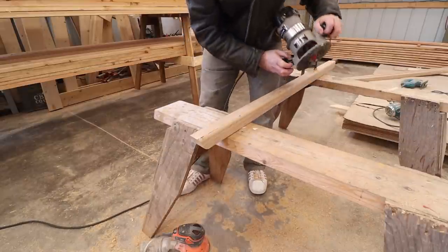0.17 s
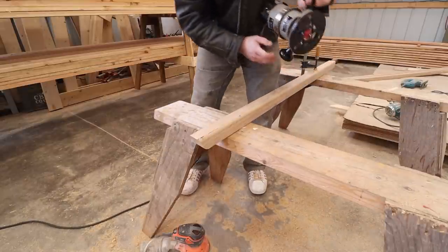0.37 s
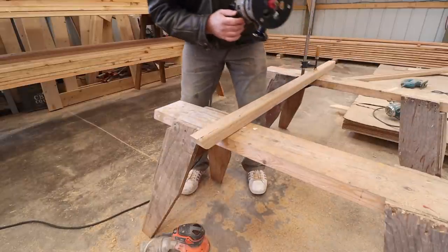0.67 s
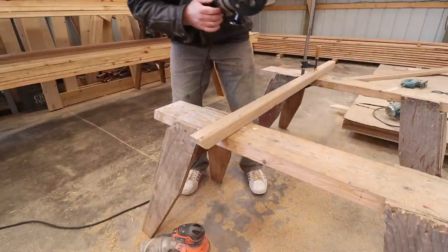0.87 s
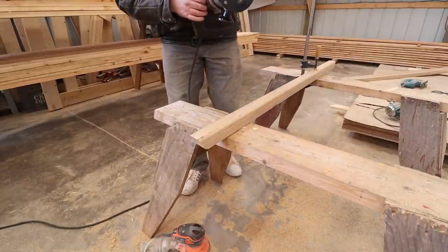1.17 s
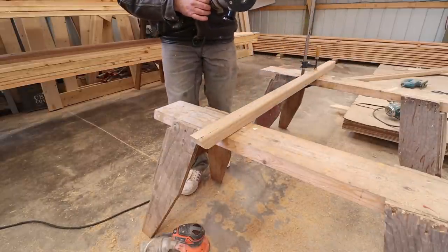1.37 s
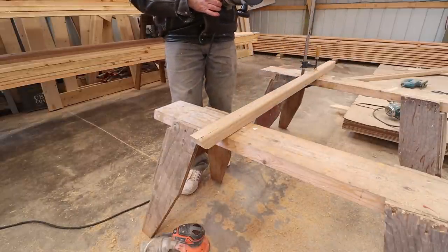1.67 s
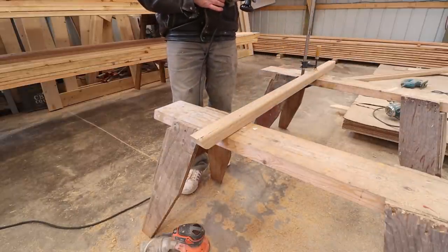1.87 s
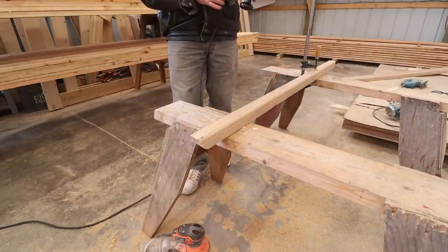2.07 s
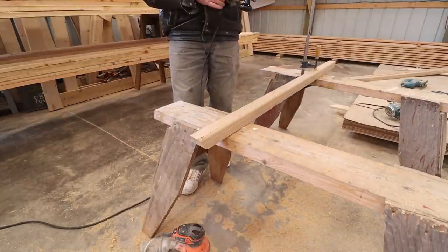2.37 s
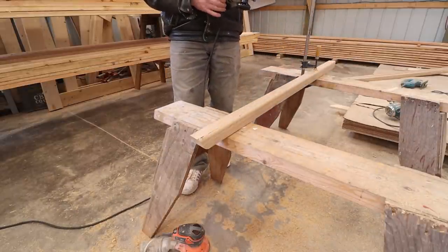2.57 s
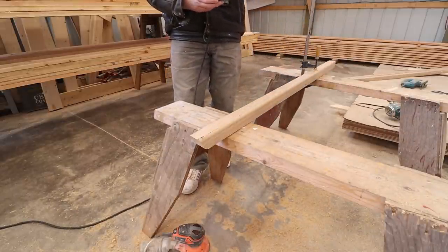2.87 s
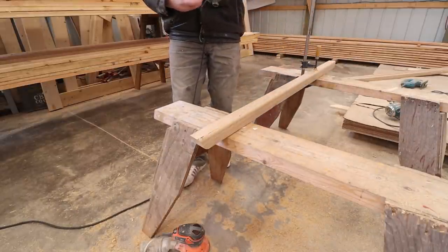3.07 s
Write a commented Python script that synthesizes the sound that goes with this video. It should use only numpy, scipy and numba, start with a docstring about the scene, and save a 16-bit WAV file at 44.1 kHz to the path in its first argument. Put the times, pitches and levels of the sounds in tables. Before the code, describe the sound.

A handheld router runs unloaded, with a broad airy roar and piercing whine that swing in tone as it is lifted and turned, then switched off and starting to slow, in a reverberant workshop, miked nearby.

```python
"""A broad airy rush with shifting hollow rings and a swinging whine: a handheld router runs free in a timber
workshop, lifted off the work, turned in the hands and switched off. The cooling fan's rush through the housing
vents is filtered noise; blades, cutter and commutator sing as sines on multiples of the shaft speed.
The concrete floor mirrors the rush a few milliseconds late, and the shop reverberates rush and tones."""
import sys
import numpy as np
from scipy import signal
from scipy.fft import rfft, irfft
from scipy.io import wavfile
from scipy.ndimage import uniform_filter1d, map_coordinates
from numba import njit

SR = 44100
rng = np.random.default_rng(int(sys.argv[2]) if len(sys.argv) > 2 else 0)


def wav_out(sig):
    """Save sig, one row per channel (or a flat mono array), as 16-bit PCM at SR to the path in sys.argv[1]."""
    wavfile.write(sys.argv[1], SR, np.round(np.clip(np.atleast_2d(sig).T, -1, 1) * 32767).astype(np.int16))


N = 141120

FLICKER_HZ = 7  # pace of the flicker in the noise slices and the resonances


def undb(db):
    """Turn dB into gain."""
    return 10 ** (np.asarray(db) / 20)


def curve(table, column):
    """Draw one column of a table as straight lines over time, sample by sample."""
    rows = np.array(table, float)
    return np.interp(np.arange(N) / SR, rows[:, 0], rows[:, column])


def unit(x):
    """Scale to rms 1."""
    return x / np.sqrt(np.mean(x ** 2))


def walk(rate_hz):
    """Wander smoothly at random: levels held for 1 / rate seconds, slewed twice, spread near 1."""
    hold = int(SR / rate_hz)
    steps = np.repeat(rng.standard_normal(400), hold)[:N + hold]
    slewed = uniform_filter1d(uniform_filter1d(steps, hold), hold)
    return 1.3 * slewed[:N]


def fan():
    """Cooling air: broad rush and treble hiss of turbulence, two hollow bands and five narrower rings."""
    # Loudness of the rush: (time [s], broad rush [dB], treble [dB], top octave [dB])
    rush_levels = [(0, -31.5, -42.5, -46), (.35, -31, -40.5, -42), (.55, -30, -42.5, -44.5),
                   (.9, -31, -42.5, -46), (1.4, -30.5, -43.5, -46), (2.0, -31.5, -44.5, -47),
                   (2.43, -33, -43.5, -47), (2.8, -32.5, -46, -50.5), (3.2, -32.5, -48.5, -50.5)]
    # Spectrum of the broad rush: (frequency [Hz], relative density [dB per Hz])
    rush_colour = [(25, -46), (161, -29), (252, -14.5), (342, -12), (423, -13), (488, -9.5), (1440, -4),
                   (1740, -7), (3700, -9), (4690, -8.5), (5400, -8.5), (7000, -17), (9100, -38)]
    # Spectrum of the treble hiss: (frequency [Hz], relative density [dB per Hz])
    treble_colour = [(5000, -33), (6500, -40), (7300, 1), (8600, 2.5), (9700, 1), (10500, -5.5),
                     (11500, -15)]
    # Spectrum of the top octave: (frequency [Hz], relative density [dB per Hz])
    top_colour = [(9000, -39), (10300, -1.5), (11000, 1.5), (12600, 1.5), (14500, -4.5), (15500, -5.5),
                  (17000, -8)]
    # Wide hollow of the housing, shifting as the tool turns: (time [s], level [dB], centre [Hz])
    housing = [(0, -44, 1600), (.3, -36.5, 1880), (.8, -35, 1710), (1.5, -36, 1700), (2.3, -38.5, 1780),
               (2.9, -37.5, 1810), (3.2, -47, 1600)]
    # Wide, higher hollow of the vents, shifting likewise: (time [s], level [dB], centre [Hz])
    vent = [(0, -49, 5270), (.25, -43, 5600), (.5, -35, 5070), (.65, -33, 4500), (1.0, -38, 4860),
            (1.3, -39, 4800), (2.1, -35.5, 4900), (2.65, -39, 4840), (2.83, -38, 4970), (2.9, -60, 4960),
            (3.2, -47, 4860)]
    # Ring that slides down in pitch: (time [s], level [dB], centre [Hz])
    falling_ring = [(0, -42, 2140), (.22, -39.5, 2050), (.45, -33, 1605), (.75, -36, 1190),
                    (.88, -41.5, 1050), (1.3, -41, 1100), (1.9, -42.5, 1230), (2.55, -41.5, 1173),
                    (3.2, -45, 1020)]
    # Nasal ring in the middle: (time [s], level [dB], centre [Hz])
    nasal_ring = [(0, -36, 1560), (.3, -57, 1840), (.7, -33, 1880), (.88, -36.5, 1850), (1.02, -35, 1570),
                  (1.3, -32, 1680), (1.55, -34.5, 1740), (2.1, -37, 1854), (2.45, -40, 1790),
                  (2.9, -35, 1624), (3.2, -42.5, 1560)]
    # Low ring: (time [s], level [dB], centre [Hz])
    low_ring = [(0, -42.5, 830), (.35, -40.5, 693), (.6, -59, 646), (1.2, -47, 760), (2.3, -44.5, 716),
                (3.2, -52, 655)]
    # Bright ring: (time [s], level [dB], centre [Hz])
    bright_ring = [(0, -50, 2900), (.13, -37.5, 2950), (.35, -53, 2900), (1.9, -57, 2150), (2.3, -39, 2080),
                   (2.9, -51, 2120)]
    # Hissing ring: (time [s], level [dB], centre [Hz])
    hiss_ring = [(0, -42.5, 6350), (.35, -51, 6230), (.55, -34.5, 5900), (.75, -52, 5800), (1.4, -46, 5430),
                 (1.9, -36, 5600), (2.6, -36.5, 5640), (2.8, -41.5, 5330), (2.92, -46, 4640),
                 (3.1, -38, 4700), (3.2, -36, 4650)]
    ring_width_hz = 253
    swell_db, swell_hz = 0.4, 10  # the whole rush
    treble_swell_db, treble_swell_hz = 0.5, 8

    rush = coloured(rush_colour) * undb(curve(rush_levels, column=1))
    treble = coloured(treble_colour) * undb(curve(rush_levels, column=2))
    treble = treble + coloured(top_colour) * undb(curve(rush_levels, column=3))
    treble = treble * undb(treble_swell_db * walk(treble_swell_hz))
    hollows = resonance(housing, width_hz=960) + resonance(vent, width_hz=2100)
    rings = (resonance(falling_ring, ring_width_hz) + resonance(nasal_ring, ring_width_hz)
             + resonance(low_ring, width_hz=137) + resonance(bright_ring, ring_width_hz)
             + resonance(hiss_ring, width_hz=680))
    return (rush + treble + hollows + rings) * undb(swell_db * walk(swell_hz))


def coloured(table):
    """Turbulence noise of a given spectrum, in overlapping third-octave slices that each flicker alone."""
    flicker_db = 1.0
    rows = np.array(table, float)
    hz = np.arange(N // 2 + 1) * SR / N + 1  # 1 Hz up, so the logarithm exists at zero
    density_db = np.interp(np.log(hz), np.log(rows[:, 0]), rows[:, 1], left=-80, right=-80)
    spectrum = rfft(rng.standard_normal(N)) * undb(density_db)
    place = 3 * np.log2(hz)  # position in third-octaves
    noise = np.zeros(N)
    for centre in range(13, 44):  # about 20 Hz to 20 kHz
        triangle = np.clip(1 - abs(place - centre), 0, 1)
        noise += irfft(spectrum * triangle, N) * undb(flicker_db * walk(FLICKER_HZ))
    return unit(noise)


def resonance(table, width_hz):
    """Turbulent air ringing in a hollow of the housing: noise through two moving band-passes."""
    flicker_db = 0.6
    centre_hz = curve(table, column=2)
    air = rng.standard_normal(N)
    for _ in range(2):
        air = svf(air, centre_hz, float(width_hz))
    return unit(air) * undb(curve(table, column=1) + flicker_db * walk(FLICKER_HZ))


@njit
def svf(x, hz, width):
    """State-variable band-pass with a moving centre, unity gain at its peak."""
    y, band, low = np.empty(len(x)), 0., 0.
    for i in range(len(x)):
        g = np.tan(np.pi * hz[i] / SR)
        damping = width / hz[i]
        v = (band + g * (x[i] - low)) / (1 + g * (g + damping))
        band = 2 * v - band
        low = low + 2 * g * v
        y[i] = damping * v
    return y


def tones():
    """Blades, cutter and commutator pass a fixed number of times per turn, so they sing on shaft multiples."""
    # Fan-blade tone, swinging as the tool turns: (time [s], level [dB])
    blade_levels = [(0, -42), (.2, -39), (.24, -48), (.28, -35), (.34, -48), (.4, -38), (.48, -49),
                    (.54, -32.5), (.58, -39), (.62, -36.5), (.7, -41.5), (.87, -37), (.92, -56), (.99, -41),
                    (1.12, -52), (1.23, -38.5), (1.35, -58), (1.44, -46), (1.57, -41.5), (1.65, -41),
                    (1.7, -52), (1.77, -54), (1.82, -42.5), (1.9, -44), (1.97, -54), (2.03, -47.5),
                    (2.23, -46), (2.45, -48), (2.62, -51.5), (2.9, -43.5), (2.94, -56), (3.2, -52)]
    # Shaft-driven tones: (time [s], two-edged cutter [dB], commutator whine [dB])
    cutter_levels = [(0, -47, -57), (.45, -53, -58), (.6, -45, -54), (.85, -42.5, -55), (1.0, -42, -67),
                     (1.3, -41.5, -64), (1.68, -41.5, -57), (1.9, -47, -66), (2.15, -49.5, -70),
                     (2.45, -46.5, -70), (2.9, -46.5, -72), (3.04, -54, -55), (3.2, -56, -57)]
    blade_count, edge_count, bar_count = 17, 2, 22
    flutter_db, flutter_hz = 1.1, 35  # the blade tone flutters
    waver_db, waver_hz = 3, 12  # commutator whine and sidebands waver
    overtone_db, sideband_db, shaft_db = -26, -18, -14  # first two under the blades, last under the cutter
    turns = shaft()

    def line(count):
        """A sine of rms 1, count cycles per turn of the shaft."""
        return np.sqrt(2) * np.sin(2 * np.pi * (count * turns + rng.random()))

    def waver():
        """Slow random gain."""
        return undb(waver_db * walk(waver_hz))

    blades = line(blade_count) * undb(flutter_db * walk(flutter_hz))
    blades = blades + undb(overtone_db) * line(2 * blade_count)
    for side in (-1, 1):  # blades beating with the cutter
        blades = blades + undb(sideband_db) * line(blade_count + side * edge_count) * waver()
    cutter = line(edge_count) + undb(shaft_db) * line(count=1)
    commutator = line(bar_count) * waver()
    # the blade level glides in gain, the others in dB
    blade_gain = curve([(s, undb(db)) for s, db in blade_levels], column=1)
    return (blade_gain * blades + undb(curve(cutter_levels, column=1)) * cutter
            + undb(curve(cutter_levels, column=2)) * commutator)


def shaft():
    """Turns of the shaft: it regains speed once unloaded, then coasts against air drag."""
    free_hz, start_short_hz, recover_s = 453.95, 19.5, 0.73  # unloaded speed, shortfall at start, time constant
    off_s, drag_s = 2.449, 3.4  # switch-off; time in which drag would halve the speed
    t = np.arange(N) / SR
    powered_hz = free_hz - start_short_hz * np.exp(-t / recover_s)
    hz = powered_hz / (1 + np.maximum(t - off_s, 0) / drag_s)
    return np.cumsum(hz) / SR


def floor_image(air):
    """The floor's mirror image of the rush: duller, quieter, and late by the extra path at 343 m/s."""
    # Detour by way of the floor: (time [s], extra path [m])
    floor_path = [(0, 0.81), (.2, 1.04), (.75, 1.4), (1.1, 1.3), (2.2, 1.27), (2.8, 1.05), (3.2, 1.14)]
    floor_db, floor_top_hz = -17.5, 3540
    dull = signal.sosfilt(signal.butter(1, floor_top_hz, fs=SR, output="sos"), air)
    delay = curve(floor_path, column=1) / 343 * SR
    return undb(floor_db) * map_coordinates(dull, [np.arange(N) - delay], mode="mirror")


def shop_reverb(air, lines):
    """Reverberation of the shop: rush and tones smeared by exponentially decaying noise."""
    t60_s, air_db, tone_db = 0.35, -19, -13
    t = np.arange(SR) / SR
    tail = rng.standard_normal(SR) * np.exp(-np.log(1000) * t / t60_s)
    tail /= np.sqrt(np.sum(tail ** 2))
    sent = undb(air_db) * air + undb(tone_db) * lines
    # a reversed second ahead, so the shop already rings at the start
    with_lead_in = np.concatenate([sent[SR:0:-1], sent])
    return signal.fftconvolve(with_lead_in, tail)[SR:SR + N]


def scene():
    """Fan with its floor image, direct tones and the shop's reverberation, alike in both channels."""
    air, lines = fan(), tones()
    mono = air + floor_image(air) + shop_reverb(air, lines) + lines
    return np.array([mono, mono])


def record(dry):
    """One microphone whose response dips at a few places, and a recorder that cuts the top steeply."""
    # Steady dips at the microphone: (centre [Hz], width [Hz], depth [0-1])
    dips = [(418, 53, 0.22), (1410, 40, 0.11), (3680, 660, 0.51)]
    top_hz = 15680
    for hz, width_hz, depth in dips:
        peak_b, peak_a = signal.iirpeak(hz, hz / width_hz, fs=SR)
        dry = dry - depth * signal.lfilter(peak_b, peak_a, dry)
    return signal.sosfilt(signal.ellip(12, .2, 75, top_hz, fs=SR, output="sos"), dry)


dry = scene()
out = record(dry)
wav_out(out)
```